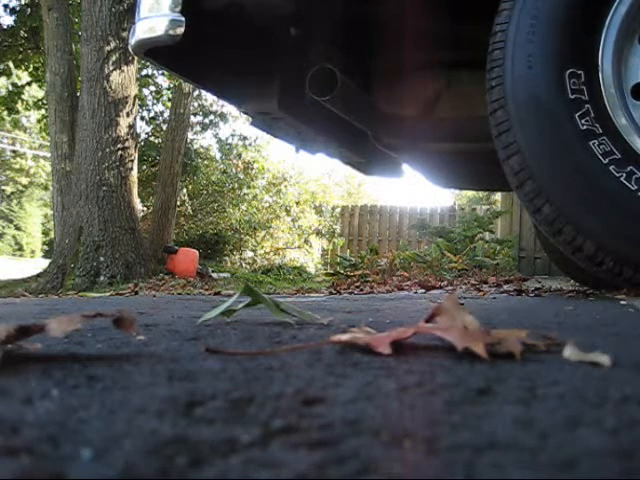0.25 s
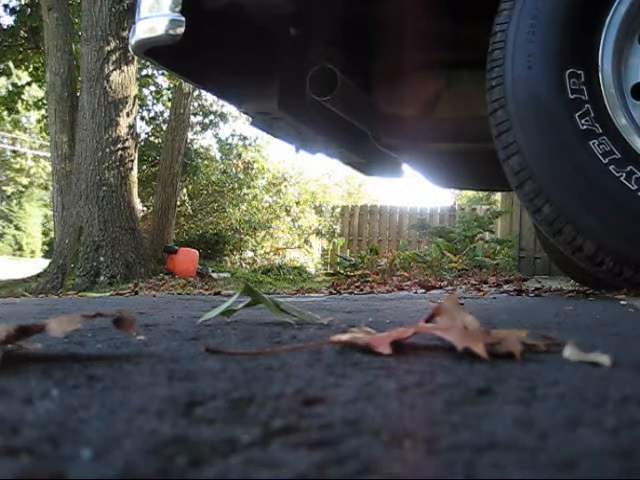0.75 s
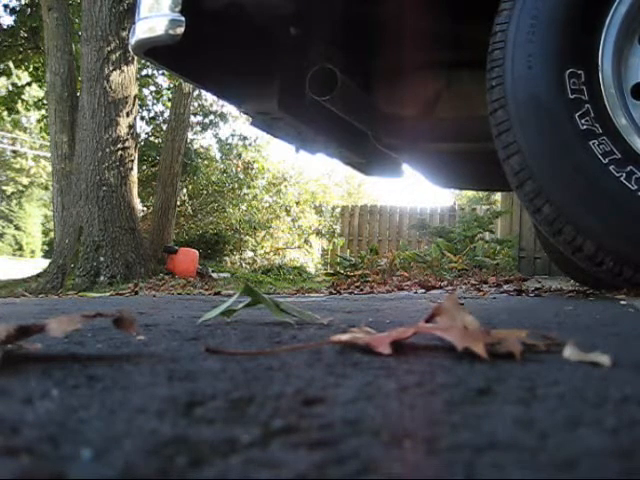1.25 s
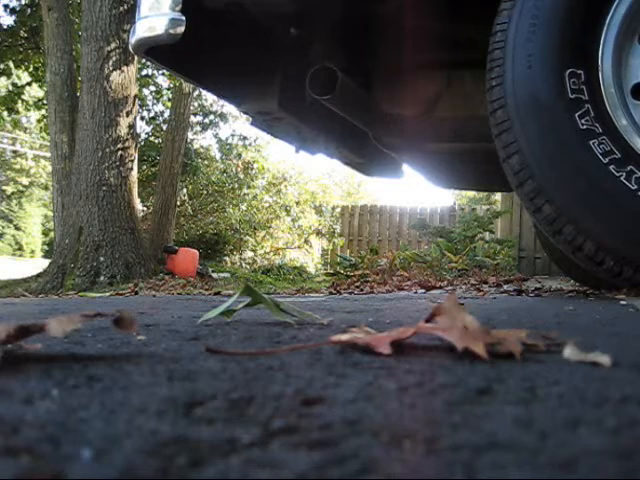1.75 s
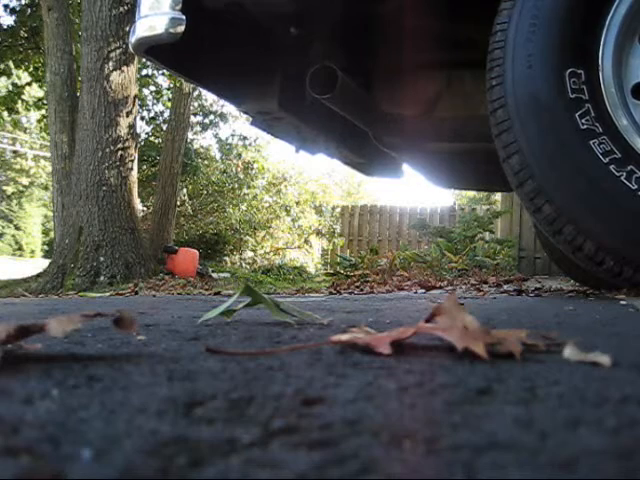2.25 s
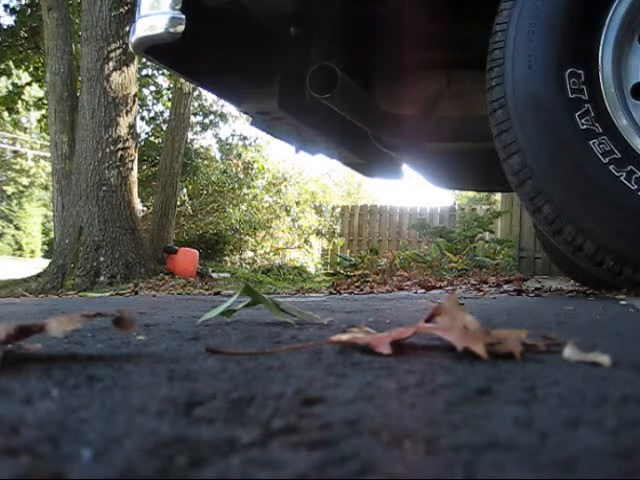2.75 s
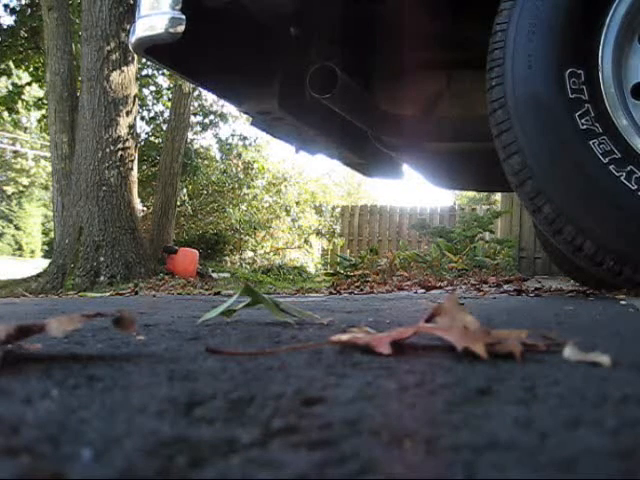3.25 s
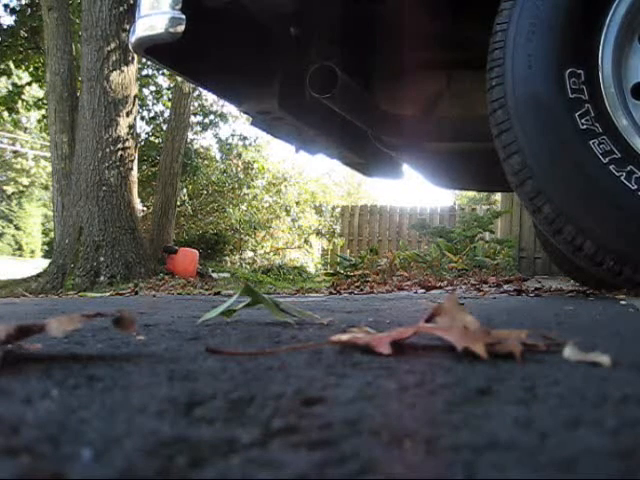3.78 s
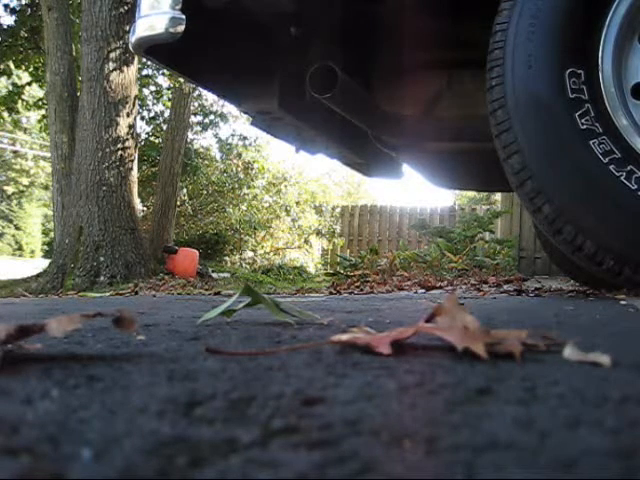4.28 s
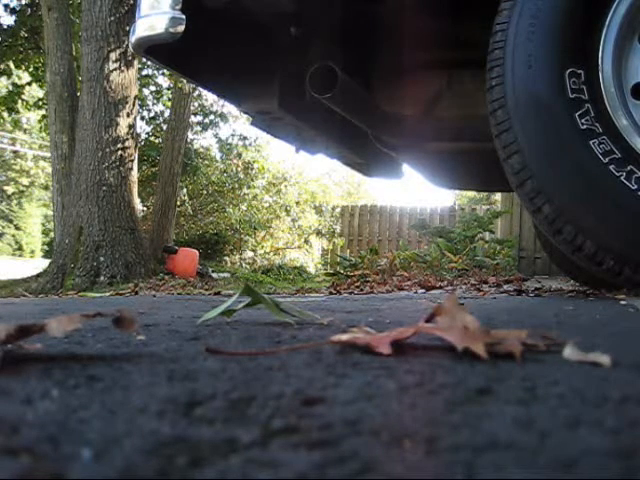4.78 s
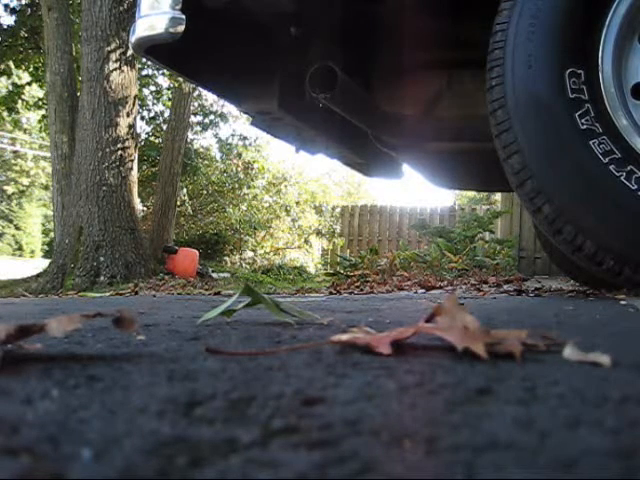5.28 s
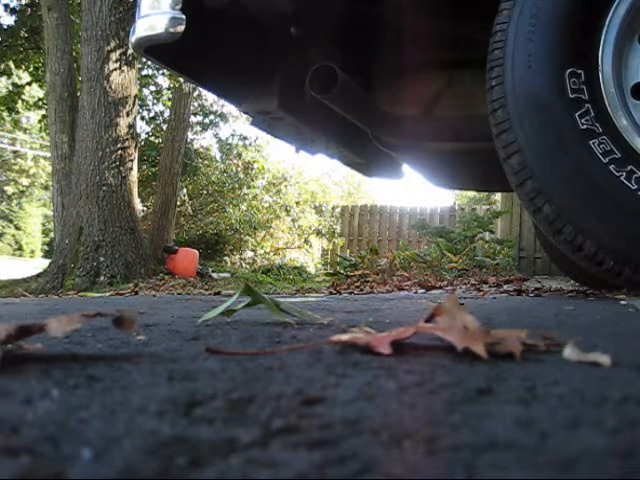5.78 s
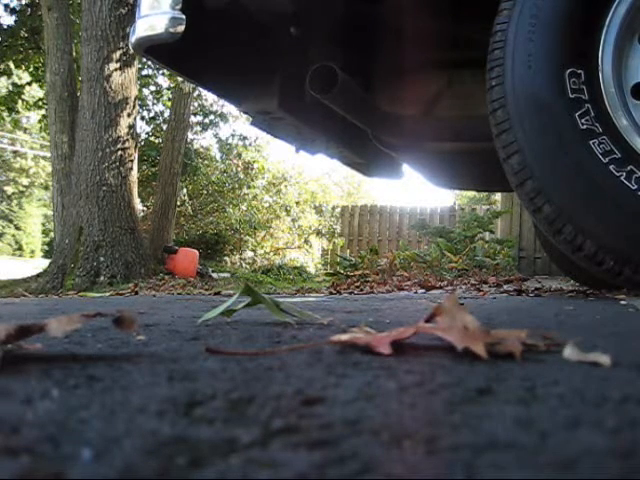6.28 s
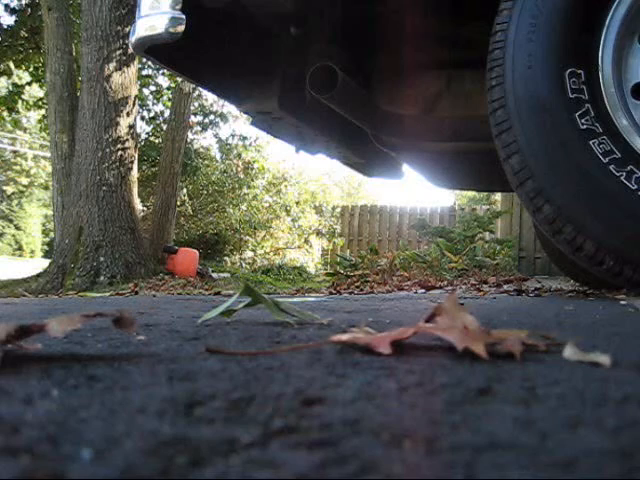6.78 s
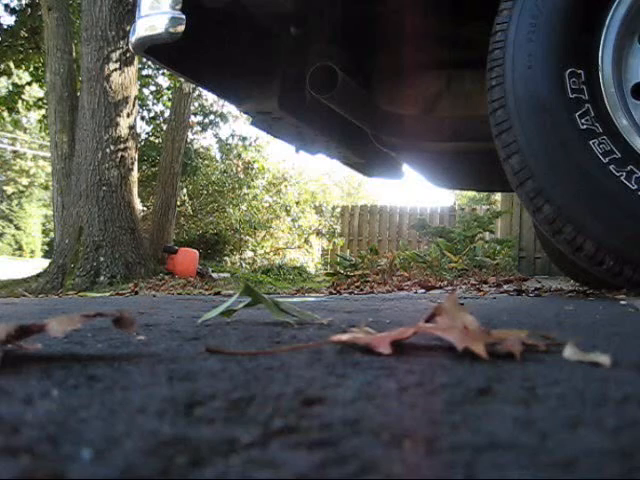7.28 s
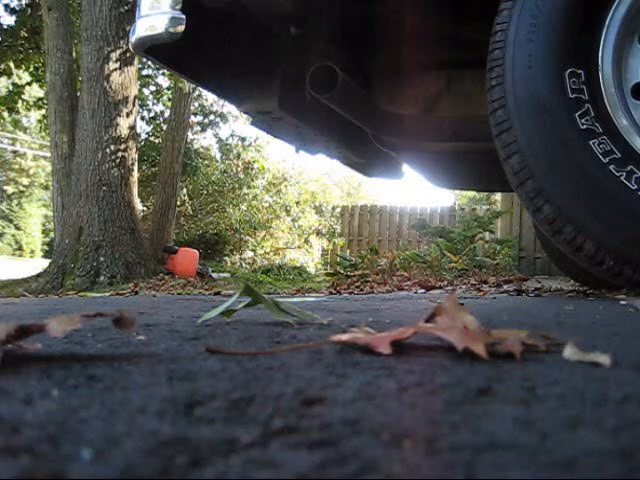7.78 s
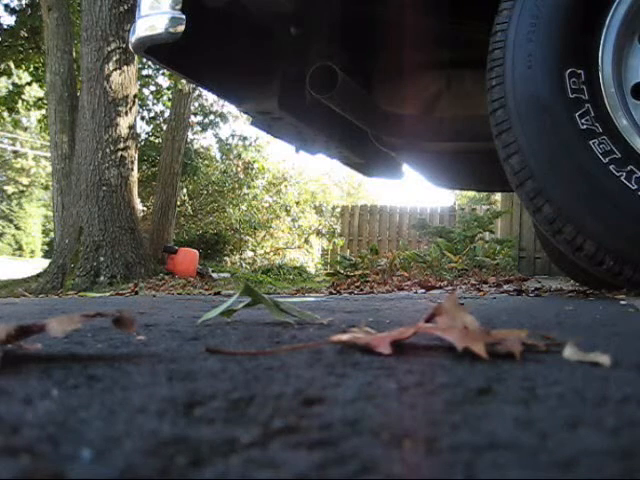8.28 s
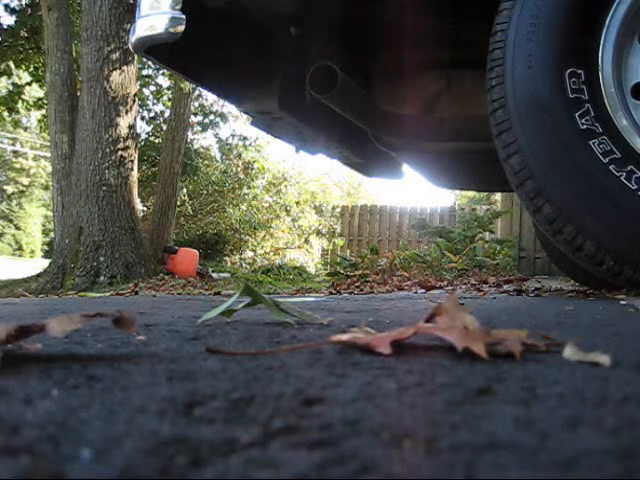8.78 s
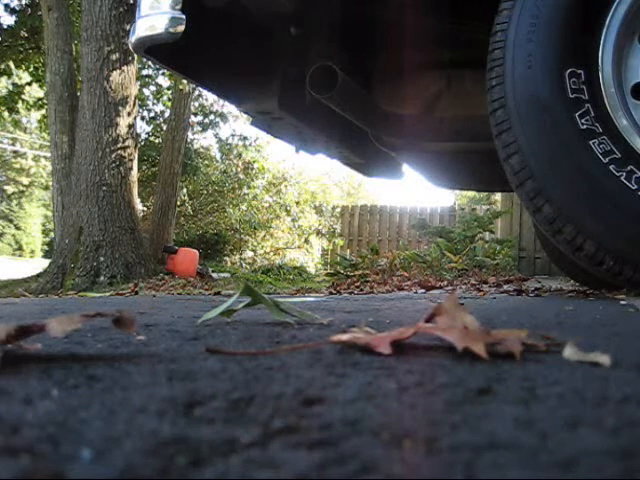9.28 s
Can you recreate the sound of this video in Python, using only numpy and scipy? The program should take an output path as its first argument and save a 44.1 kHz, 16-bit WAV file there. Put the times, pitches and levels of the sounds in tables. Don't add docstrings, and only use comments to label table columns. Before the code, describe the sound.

From beneath a truck: insects and leaves, footsteps, a hard door slam, a short labouring crank, then a roaring start whose revs gradually fall.

```python
import sys
import numpy as np
from scipy import signal
from scipy.fft import rfft, irfft, next_fast_len
from scipy.io import wavfile
from scipy.ndimage import uniform_filter1d, map_coordinates

SR = 44100
rng = np.random.default_rng(int(sys.argv[2]) if len(sys.argv) > 2 else 0)


def dump_mix(stems):
    frames = np.atleast_2d(stems).T
    limited = np.clip(frames, -1, 1)
    pcm = np.round(limited * 32767).astype(np.int16)
    wavfile.write(sys.argv[1], SR, pcm)


def decibels_to_gain(level_db):
    exponent = np.asarray(level_db, float) / 20
    return 10 ** exponent


N = 420713
T = np.arange(N) / SR


def unit(x):
    return x / np.sqrt(np.mean(x ** 2) + 1e-20)


def curves(rows, outside=None):
    s, *cols = np.transpose(rows)
    return [np.interp(T, s, c, outside, outside) for c in cols]


def swells(rows):
    slopes = []
    for s, db, rise, fall in rows:
        slopes.append(db - np.where(T < s, abs(rise) * (s - T), abs(fall) * (T - s)))
    return np.max(slopes, axis=0)


def wobble(rate):
    return map_coordinates(rng.standard_normal(int(N * rate / SR) + 4), [T * rate])


def filtered(x, response):
    m = next_fast_len(len(x) + 8192)
    return irfft(rfft(x, m) * response(np.fft.rfftfreq(m, 1 / SR)), m)[:len(x)]


def colour(points):
    f, db = np.transpose(points)
    return lambda hz: decibels_to_gain(np.interp(np.log(hz + 1), np.log(f + 1), db))


def ringing(modes):
    def response(f):
        total = 0
        for k, (centre, width, db) in enumerate(modes):
            damping = 1j * f * width
            total = total + (-1) ** k * decibels_to_gain(db) * damping / (centre * centre - f * f + damping)
        return total
    return response


def lift(hz, modes):
    return sum(db / (1 + (2 * (hz - centre) / width) ** 2) for centre, width, db in modes)


def rush(response, patchy_db):
    z = signal.stft(rng.standard_normal(N), nperseg=512)[2]
    field = uniform_filter1d(rng.standard_normal(z.shape), size=5, axis=0)
    field = uniform_filter1d(field, size=10, axis=1)
    noise = signal.istft(z * decibels_to_gain(patchy_db * unit(field)), nperseg=512)[1][:N]
    return unit(filtered(noise, response))


def tone(hz, smear_hz):
    knots = int(len(hz) * smear_hz / SR) + 4
    a, b = (map_coordinates(rng.standard_normal(knots), [T[:len(hz)] * smear_hz]) for _ in range(2))
    carrier = np.exp(2j * np.pi * np.cumsum(hz) / SR)
    return unit(((25 / smear_hz + a + 1j * b) * carrier).real)


def blows(rows, rise):
    out, t = np.zeros(N + SR), T[:SR // 2]
    for s, db, hz, width, t60 in rows:
        narrow, wide = ringing([(hz, width, 0)]), ringing([(hz, 3 * width, 0)])
        puff = unit(filtered(rng.standard_normal(len(t)), lambda f: narrow(f) * wide(f) / (1 + 1j * f / 9000)))
        out[round(s * SR):][:len(t)] += puff * decibels_to_gain(db - 60 * t / t60) * (1 - np.exp(-t / rise))
    return out[:N]


def whistles(rows, smear_hz):
    out = np.zeros(N)
    for start, end, first_hz, last_hz, db in rows:
        u = np.linspace(0, 1, round((end - start) * SR))
        hz = first_hz + (last_hz - first_hz) * u ** 0.68
        out[round(start * SR):][:len(u)] += decibels_to_gain(db) * np.sin(np.pi * u) ** 0.22 * tone(hz, smear_hz)
    return out


# f/Hz, level/dB [per Hz]
YARD_COLOUR = [(15, -44), (25, -13), (129, -6.5), (281, -7.5), (945, -5), (1490, -9), (2770, -8.5),
               (4500, -13), (5010, -9), (5430, -10), (7910, -16), (10100, -18.5), (15500, -26.5)]
# t/s, level/dB
YARD_LEVEL = [(1.3, -37), (2.22, -37.5), (2.57, -36), (2.8, -37.5), (3.84, -38.5), (4.44, -38)]


def yard_air():
    level_db = curves(YARD_LEVEL)[0] + 2.0 + 0.19 * wobble(4.4)
    return decibels_to_gain(level_db) * rush(colour(YARD_COLOUR), patchy_db=1.06)


# start t/s, length t/s, first f/Hz, last f/Hz, level/dB
CHIRP_SYLLABLES = [
    (0, .019, 5065, 5030, -35),
    (.019, .022, 4930, 4820, -35),
    (.041, .033, 5075, 5075, -31),
]


def near_cricket():
    since = (T + .014) % .10683
    chirps = 0
    for start, length, first_hz, last_hz, db in CHIRP_SYLLABLES:
        u = np.clip((since - start) / length, 0, 1)
        hz = first_hz + (last_hz - first_hz) * u + 25 * wobble(300)
        chirps = chirps + decibels_to_gain(db) * np.abs(np.sin(np.pi * u)) ** 0.23 * np.sin(2 * np.pi * np.cumsum(hz) / SR)
    return decibels_to_gain(-2.0 + .8 * wobble(5.9) + 0.64 * wobble(150)) * chirps


def beat(first, period, length):
    u = np.clip((T - first) % period / length, 0, 1)
    size_db = 0.37 * rng.standard_normal(200)[((T - first) // period).astype(int) + 1]
    return decibels_to_gain(size_db) * np.sin(np.pi * u) ** 0.96


# first t/s, period t/s, length t/s, f/Hz, level/dB
FAR_INSECTS = [(.025, .0909, .03, 6520, -45), (.05, .0935, .05, 6050, -46),
               (-.006, .1112, .014, 10300, -47)]
FAR_SMEAR = (250, 300, 10)


def far_insects():
    chorus = 0
    for (first, period, length, hz, db), smear_hz in zip(FAR_INSECTS, FAR_SMEAR):
        pulses = beat(first, period, length) * tone(np.full(N, hz), smear_hz)
        chorus = chorus + decibels_to_gain(db + 0.28 * wobble(0.55)) * pulses
    return chorus


# t/s, level/dB, ring f/Hz, width f/Hz, t60 t/s
STEPS = [(.362, -27, 497, 700, 0.22), (.73, -29, 600, 400, .08), (1.571, -28, 100, 50, 0.22),
         (1.572, -33.5, 500, 800, 0.52), (2.35, -39, 300, 800, .9), (2.98, -36, 500, 800, .08),
         (3.97, -31, 500, 905, 0.054), (4.01, -31.5, 150, 300, 0.28)]


def footsteps():
    return blows(STEPS, .004)


# t/s, level/dB, ring f/Hz, width f/Hz, t60 t/s
LATCH = [
    (.808, -5.5, 630, 440, 0.031),
    (.8075, -5, 4000, 21000, 0.042),
    (.827, -15, 2100, 2000, .05),
    (.833, -9, 700, 900, 0.053),
]
# f/Hz, level/dB [per Hz]
PANELS = [(15, -40), (25, -10), (48, -9), (173, -0.5), (300, -10), (532, -2), (780, -7.5), (1300, -6.5),
          (1780, -13.5), (4000, -25), (5200, -50), (8800, -120)]
# f/Hz, level/dB [per Hz]
RATTLE = [(710, -40), (1200, -2), (1820, -14), (2070, -6.5), (2950, -12.5), (8980, -29.5), (15500, -46)]
# t/s, level/dB, rise [dB/s], fall [dB/s]
PANEL_SHAKE = [
    (.832, -18, 150, 67),
    (.998, -17, 49, 104),
]
# t/s, level/dB, rise [dB/s], fall [dB/s]
RATTLE_SHAKE = [
    (.832, -17.5, 150, 135),
    (.998, -24.5, 80.5, 110),
]


def door():
    since = np.maximum(T - .8071, 0)
    ring = np.sin(2 * np.pi * 1400 * since) + .5 * np.sin(2 * np.pi * 470 * since)
    striker = -decibels_to_gain(-60 * since / .03) * ring
    lumps = decibels_to_gain(1.2 * wobble(90))
    panels = decibels_to_gain(swells(PANEL_SHAKE)) * unit(lumps * rush(colour(PANELS), patchy_db=.7))
    rattle = decibels_to_gain(swells(RATTLE_SHAKE)) * unit(lumps * rush(colour(RATTLE), patchy_db=.8))
    return striker + blows(LATCH, 0.00057) + (since > 0) * (panels + rattle)


def echoes(x):
    tail = rng.standard_normal(SR // 4) * decibels_to_gain(-60 * T[:SR // 4] / .25)
    return x + decibels_to_gain(-7.0) * signal.fftconvolve(x, tail / np.linalg.norm(tail))[:N]


# start t/s, end t/s, first f/Hz, last f/Hz, level/dB
BIRDS = [
    (3.1, 3.46, 8300, 7770, -43.5),
    (3.94, 4.32, 8330, 7600, -44.5),
]
# start t/s, end t/s, first f/Hz, last f/Hz, level/dB
SQUEAKS = [(3.285, 3.335, 1860, 1820, -40), (3.62, 3.66, 1850, 2150, -41), (4.135, 4.178, 2130, 2550, -37),
           (4.17, 4.215, 2540, 2520, -33), (4.271, 4.287, 1900, 3400, -37), (4.322, 4.339, 2750, 3300, -38),
           (4.343, 4.35, 3400, 2750, -37)]


def animals():
    return echoes(decibels_to_gain(2.3 * wobble(30)) * whistles(BIRDS, 620) + whistles(SQUEAKS, 45))


# t/s, level/dB, ring f/Hz, width f/Hz, t60 t/s
KEY = [
    (4.465, -26.5, 4000, 4970, .16),
    (4.48, -30, 11500, 6000, 0.23),
    (4.49, -19, 2200, 2500, 0.11),
    (4.52, -29, 2500, 5000, 0.95),
]


def ignition_key():
    return blows(KEY, .005)


# t/s, level/dB, ring f/Hz, width f/Hz, t60 t/s
PLUNGER = [
    (4.562, -4, 3270, 2600, 0.06),
    (4.569, -5.5, 795, 504, 0.12),
    (4.575, -20.5, 220, 200, 0.2),
    (4.591, -16, 1000, 600, .1),
    (4.602, -2.5, 850, 500, 0.079),
]
# t/s, level/dB, ring f/Hz, width f/Hz, t60 t/s
SOLENOID = [
    (4.604, -13.5, 3500, 4000, 0.16),
    (4.6192, -8.5, 6000, 4470, 0.043),
    (4.62, -9.5, 2500, 1200, 0.066),
    (5.15, -30, 6000, 4000, .12),
    (5.273, -19, 5400, 4920, .08),
]


def solenoid():
    return blows(PLUNGER, 0.014) + blows(SOLENOID, 0.00083)


# f/Hz, level/dB [per Hz]
GRIND = [(59, -81), (100, -49), (214, -15.5), (682, 1.5), (998, -5.5), (2690, -4.5), (7410, -22),
         (13400, -33), (14500, -41), (15500, -79)]
# f/Hz, width f/Hz, level/dB
HOUSING = [(717, 17, -12), (860, 48, 1.5), (1372, 10, 5), (1486, 27, 1), (1940, 200, -6.5),
           (2500, 63, -1.5), (4660, 45, -16), (5500, 82, -18), (8060, 57, -16.5)]
# t/s, level/dB, rise [dB/s], fall [dB/s]
GRINDING = [
    (4.69, -18, 130, 40),
    (4.9, -16, 20, 10),
    (5.06, -15.5, 150, 26),
    (5.25, -16.5, 14, 130),
]


def starter_motor():
    ring = rush(ringing(HOUSING), patchy_db=2.0)
    grind = unit(rush(colour(GRIND), patchy_db=1.0) + 0.83 * ring) * (T > PLUNGER[-1][0])
    return decibels_to_gain(swells(GRINDING)) * grind


# start t/s, end t/s, slowest tooth f/Hz, fastest tooth f/Hz, load shed by the end [0-1]
STROKES = [
    (4.645, 4.925, 1750, 3150, .4),
    (4.92, 5.15, 1750, 3450, .85),
]


def strokes():
    tooth_hz, (speed, on, late, load) = np.full(N, 1750.), np.zeros((4, N))
    for start, end, slow_hz, fast_hz, shed in STROKES:
        u = np.clip((T - start) / (end - start), 0, 1)
        arc = np.abs(np.sin(np.pi * u))
        tooth_hz = np.maximum(tooth_hz, slow_hz + (fast_hz - slow_hz) * arc)
        speed = speed + arc
        on = on + np.clip(arc / 0.36, 0, 1) ** 2
        late = late + u % 1
        load = load + (u % 1 > 0) * (1 - shed * u)
    return tooth_hz, speed, on, late, load


def gear_whine(tooth_hz, speed, on, late, load):
    upper = decibels_to_gain(-11.5 - 12.5 * speed) * load * tone(tooth_hz, 350)
    lower = decibels_to_gain(-16 - 20 * (1 - speed)) * late * tone(.63 * tooth_hz, 320)
    return on * (upper + lower)


# f/Hz, width f/Hz, level/dB
FREEWHEEL = [(4800, 140, 5), (5800, 560, -9), (6000, 2200, 9), (7600, 600, -12)]
# t/s, level/dB, rise [dB/s], fall [dB/s]
SPIN = [
    (5.17, -21, 250, 50),
    (5.28, -19, 300, 17),
    (5.66, -28.5, 300, 9),
]


def freewheel(speed, on):
    brush = rush(lambda hz: ringing(FREEWHEEL)(hz) / (1 + (hz / 9000) ** 4), patchy_db=.8)
    cranking = on * decibels_to_gain(-18.5 - 13.5 * (1.5 - speed))
    spinning = decibels_to_gain(swells(SPIN)) * (T < 6.5)
    return (cranking + spinning) * brush


# start t/s, end t/s, first f/Hz, last f/Hz, level/dB
FLING = [
    (5.11, 5.22, 2963, 4420, -28),
]
# start t/s, end t/s, first f/Hz, last f/Hz, level/dB
RUN_DOWN = [
    (5.6, 6.1, 6600, 4590, -31),
    (6.0, 6.5, 8800, 4830, -35),
]


def pinion():
    return whistles(FLING, 200) + whistles(RUN_DOWN, 550)


def starter():
    tooth_hz, speed, on, late, load = strokes()
    cranking = solenoid() + starter_motor() + gear_whine(tooth_hz, speed, on, late, load)
    return cranking + freewheel(speed, on) + pinion()


# f/Hz, level/dB [per Hz]
HISS = [(1470, -10), (2500, -1), (3220, -2), (3780, -7), (7280, -8), (9730, -13.5), (10800, -19.5),
        (13500, -20.5), (15500, -33)]
# t/s, level/dB, rise [dB/s], fall [dB/s]
INTAKE = [
    (5.27, -21, 700, 200),
    (5.4, -21.5, 60, 1.5),
    (7.3, -24, 60, 0.56),
]


def intake_hiss(cycle):
    valve = 1 + 0.37 * np.exp(-(cycle % 1) / 0.2)
    return decibels_to_gain(swells(INTAKE)) * unit(valve * rush(colour(HISS), patchy_db=.6))


# share of the cycle [0-1], level/dB
CYLINDERS = [(0, -6), (0.126, -11), (0.248, -5), (.375, -9), (.5, -17), (.625, -5), (.75, -2), (0.874, -11)]
# f/Hz, width f/Hz, level/dB
BLOCK = [(445, 40, -8), (549, 10, -2), (632, 20, 1), (694, 20, 3), (750, 26, -5), (857, 20, -6),
         (942, 14, -5), (1053, 10, -4), (1278, 16, -5), (1340, 18, -4), (1470, 30, -9), (1738, 18, -7),
         (2250, 40, -10), (2702, 28, -8), (3283, 32, -11)]
# f/Hz, level/dB [per Hz]
ROAR = [(24, -51), (40, -53), (82, -9), (135, -20), (270, -9), (326, -13), (561, -6.5), (678, -3),
        (802, -11), (1350, -8), (6000, -19.5), (7800, -32), (13200, -120)]


def roar_and_block(cycle, burn_db):
    knocks = np.zeros(N)
    for share, db in CYLINDERS:
        knocks[np.flatnonzero(np.diff(np.floor(cycle - share)))] = decibels_to_gain(db)
    gate = np.abs(filtered(knocks, lambda hz: 1 / (1 + 1j * hz / 60)))
    gate = gate / np.mean(gate)
    pattern = rng.standard_normal(1024)
    clatter = pattern[(cycle % 1 * len(pattern)).astype(int)]
    loose = .8 * rng.standard_normal(N)
    block = unit(filtered(gate ** .2 * (clatter + loose), ringing(BLOCK)))
    roar = unit(gate ** .08 * rush(colour(ROAR), patchy_db=.8))
    block_grows = np.clip((T - 5.5) / .9, .2, 1)
    return decibels_to_gain(burn_db - 1.5) * unit(roar + decibels_to_gain(1.1 * wobble(14)) * block * block_grows)


# order [multiple of the engine cycle rate], level/dB
PIPE_ORDERS = [(3, -5), (5, -15), (7, -5), (9, -19), (10, -4), (11, 0), (12, -6), (13, -7), (14, -3),
               (17, -0.5), (18, -7), (19, 2), (20, -3), (21, 1.5), (40, 3.5)]
# f/Hz, width f/Hz, level/dB
PIPE = [(96, 32, 3), (184, 9.2, 7), (291, 17, -3.5), (450, 75, 2.5)]
# order [of the cycle rate], level/dB, mode f/Hz, width f/Hz, lift level/dB
CLEAR = [(8, -37, 95, 13, 1.5), (15.9, -47, 180.3, 36, 14), (24.23, -49, 280.4, 25, 17),
         (21.38, -54, 281, 20, 21)]
# t/s, level/dB, ring f/Hz, width f/Hz, t60 t/s
COUGHS = [
    (5.35, -25.5, 32, 19.4, .25),
    (5.42, -30, 90, 60, .3),
    (5.43, -31, 253, 300, 0.19),
    (5.47, -25, 177, 300, 0.13),
    (5.53, -21, 300, 400, 0.18),
    (5.58, -24, 151, 250, 0.18),
]


def exhaust(cycle, cycle_hz, burn_db):
    clear = 0
    for order, db, *mode in CLEAR:
        level_db = db + 4.5 + lift(order * cycle_hz, [mode]) + .7 * wobble(6)
        clear = clear + decibels_to_gain(level_db) * np.sin(2 * np.pi * round(order) * cycle)
    clear_gain = decibels_to_gain(swells([(5.37, 0, 250, 0)]))
    lope = 0
    for order, db in PIPE_ORDERS:
        phase = 2 * np.pi * round(order) * cycle + rng.uniform(0, 2 * np.pi)
        lope = lope + decibels_to_gain(db + 2.5 * wobble(4.6)) * np.sin(phase)
    throb_gain = decibels_to_gain(burn_db - 11.5 - 7 + .9 * wobble(3.37))
    throb = throb_gain * unit(0.31 * lope + filtered(lope, ringing(PIPE)))
    return clear_gain * clear + throb + blows(COUGHS, .006)


def fan(cycle_hz):
    blade_hz = 42 * cycle_hz
    level_db = -40.5 + lift(blade_hz, [(423, 190, 8.2)]) + 3 * wobble(5)
    return decibels_to_gain(swells([(5.85, 0, 60, 0)])) * decibels_to_gain(level_db) * tone(blade_hz, 20)


# f/Hz, width f/Hz, level/dB
BLOCK_CROSSINGS = [(2360, 84, 4), (2247, 49, 5.5), (1900, 50, 4.5), (1736, 77, 5.5)]


def alternator(firing_hz):
    whine_hz = 22.85 * firing_hz
    whine_db = swells([(5.85, -31, 150, 0)]) + lift(whine_hz, BLOCK_CROSSINGS) + 1.5 * wobble(12)
    return decibels_to_gain(whine_db) * tone(whine_hz + 18 * wobble(25), 24)


# t/s, f/Hz
FIRING = [(5.3, 30), (5.36, 40), (5.46, 80), (5.58, 97), (5.74, 110), (5.9, 113.4), (6.05, 112.6),
          (6.35, 108.6), (6.5, 105.5), (7.25, 95.5), (7.55, 93.3), (7.7, 90.5), (8.15, 84.6), (8.6, 81.4),
          (8.9, 77.4), (9.2, 74), (9.54, 73.9)]
# t/s, level/dB
BURN = [
    (5.3, -38),
    (5.39, -39),
    (5.44, -26),
    (5.68, -23),
    (5.76, -18),
    (6.6, -18),
    (9.54, -16.5),
]


def engine():
    firing_hz = curves(FIRING)[0]
    burn_db, = curves(BURN, -120)
    cycle = np.cumsum(firing_hz) / SR / 8
    cycle_hz = firing_hz / 8
    burning = intake_hiss(cycle) + roar_and_block(cycle, burn_db) + exhaust(cycle, cycle_hz, burn_db)
    return burning + fan(cycle_hz) + alternator(firing_hz)


# t/s, depth level/dB, attack [dB/s], release [dB/s]
DUCKS = [
    (.89, 16.5, 190, 180),
    (4.64, 10, 200, 2),
]


def gain_control(quiet):
    duck_db = np.where(T < 4.6, swells(DUCKS[:1]), swells(DUCKS[1:]))
    return decibels_to_gain(-np.maximum(0, duck_db)) * quiet


def scene():
    yard = gain_control(yard_air() + near_cricket() + far_insects() + animals())
    mono = yard + footsteps() + door() + ignition_key() + starter() + engine()
    return np.array([mono, mono])


# f/Hz, level/dB
MIC = [(20, -3), (40, 0), (13000, 0), (15000, -4), (15700, -14)]


def microphone(x):
    mono = filtered(x, colour(MIC))
    return mono / (1 + np.abs(mono / 1.02) ** 6) ** (1 / 6)


def top_cut(x):
    return signal.sosfilt(signal.butter(12, 15710, fs=SR, output="sos"), x)


def record(dry):
    mono = microphone(dry[0])
    return top_cut(np.array([mono, mono]))


dry = scene()
out = record(dry)
dump_mix(out)
```